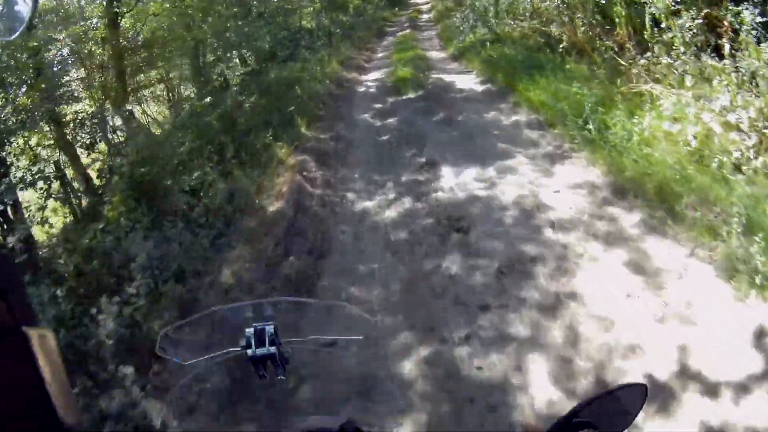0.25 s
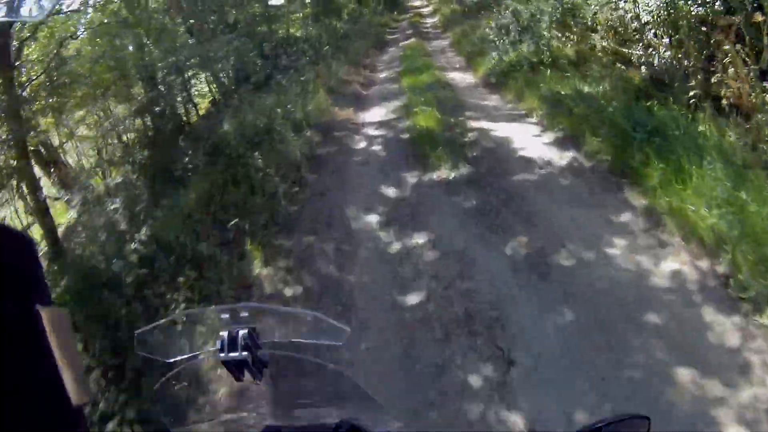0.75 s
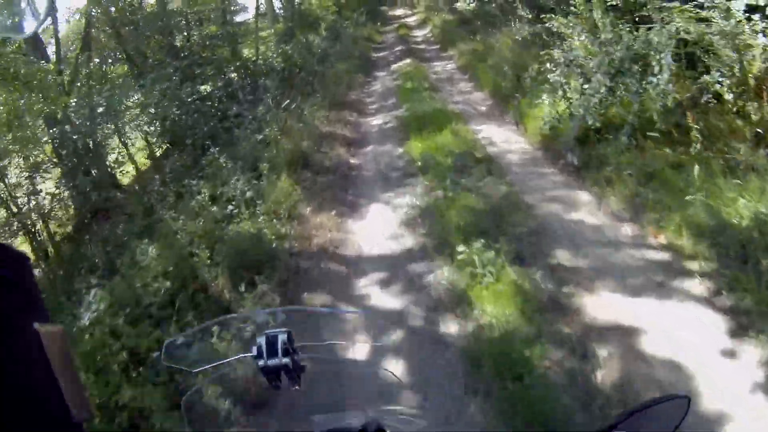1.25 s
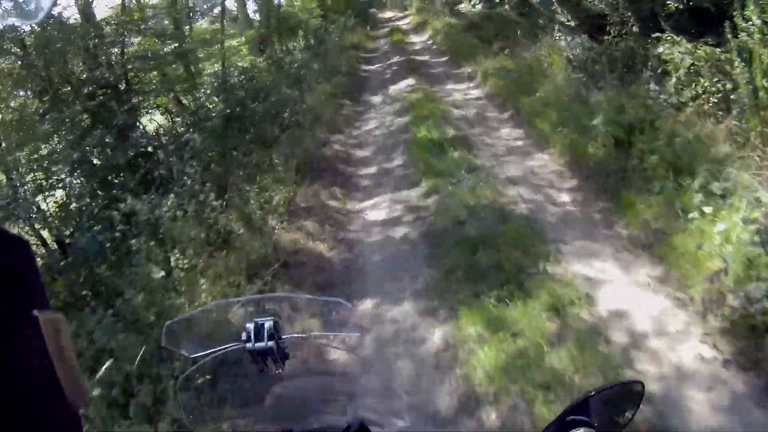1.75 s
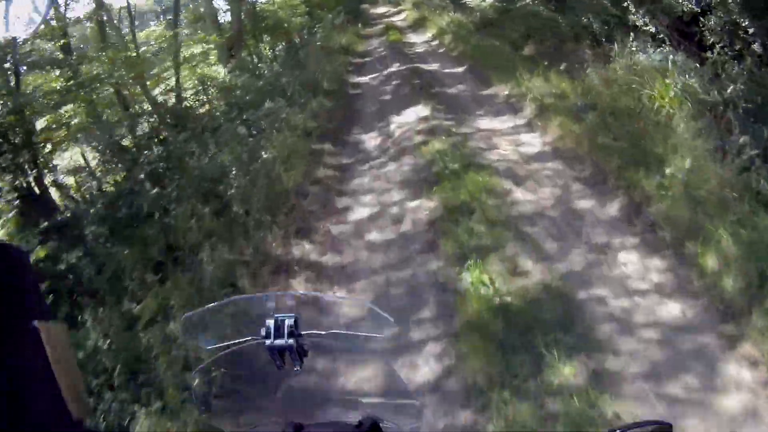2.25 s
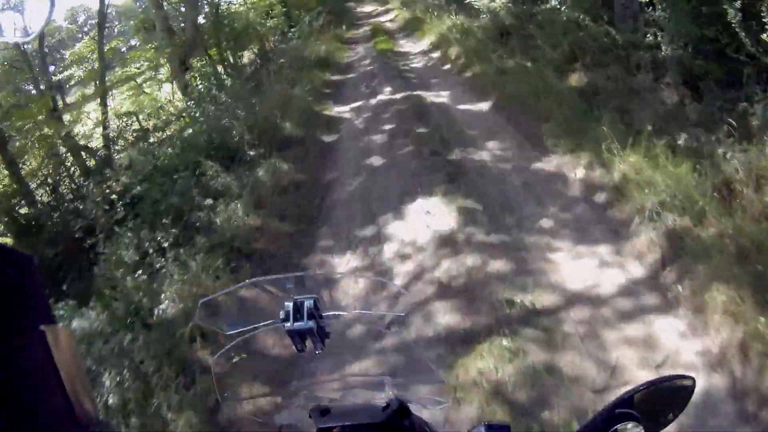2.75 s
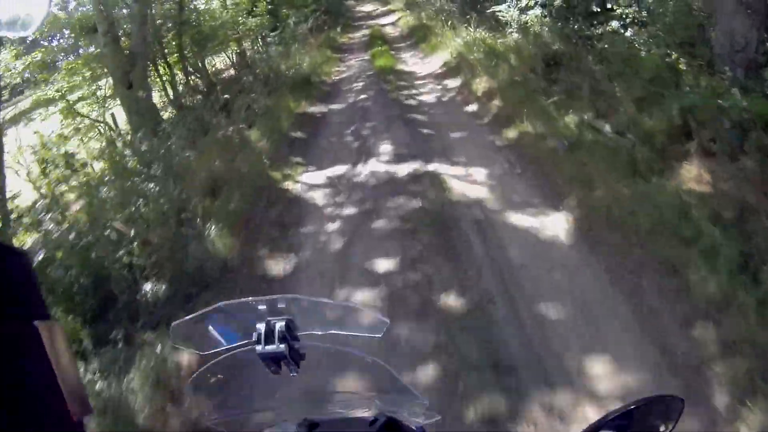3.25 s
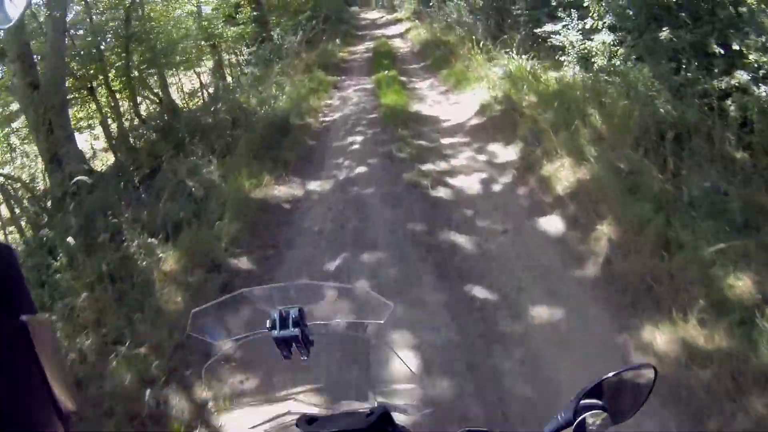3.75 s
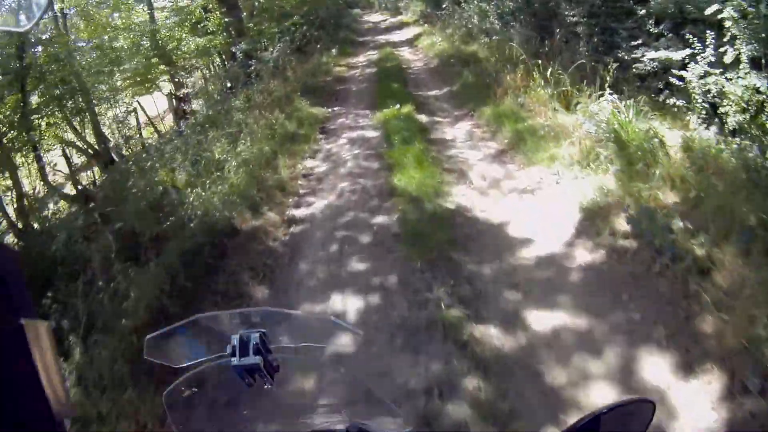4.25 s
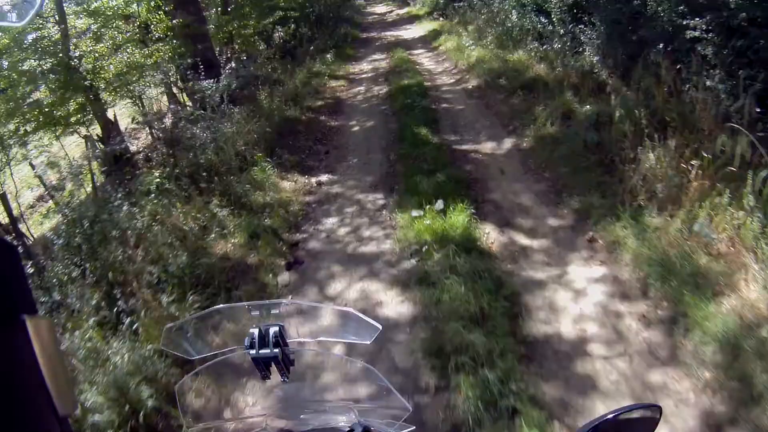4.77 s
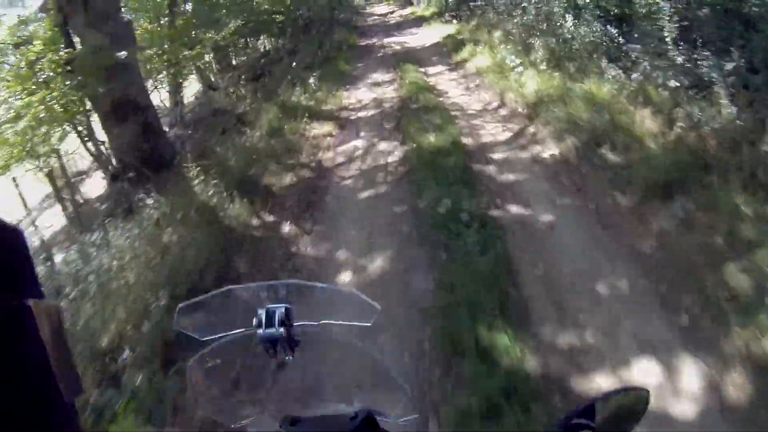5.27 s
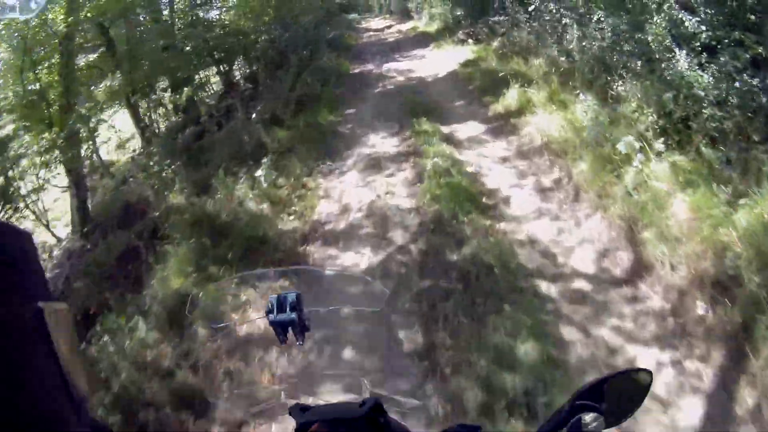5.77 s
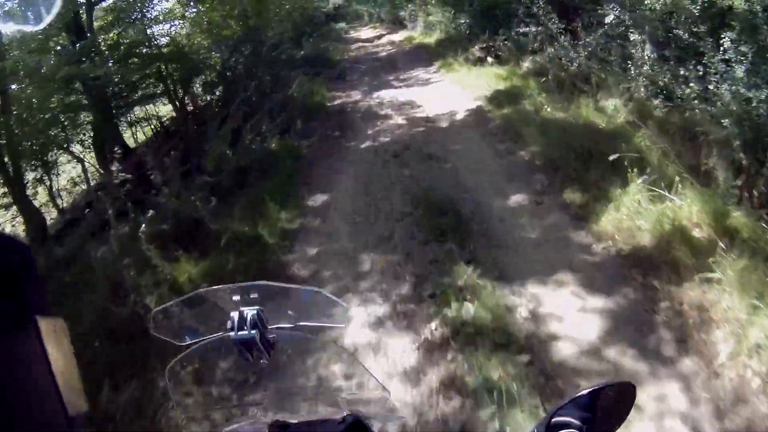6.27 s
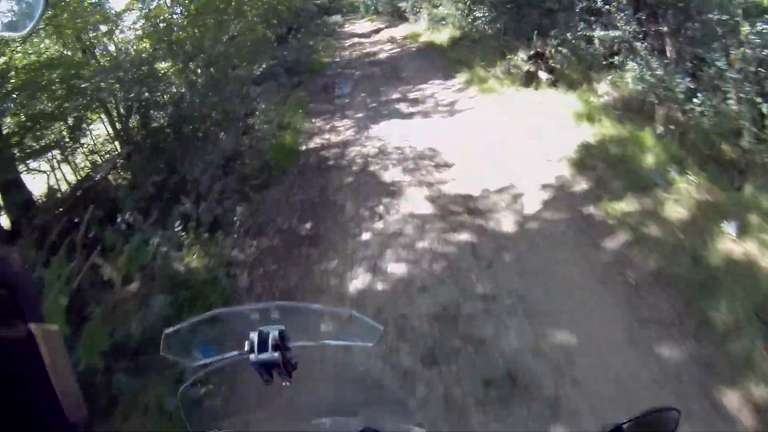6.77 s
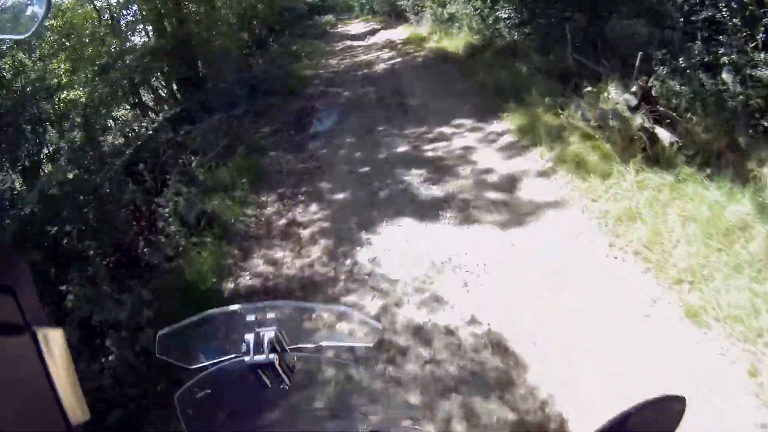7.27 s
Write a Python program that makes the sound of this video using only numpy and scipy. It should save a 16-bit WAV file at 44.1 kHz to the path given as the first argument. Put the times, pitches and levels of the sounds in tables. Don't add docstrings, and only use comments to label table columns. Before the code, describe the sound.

A camera loose in its sealed plastic case knocks irregularly against the walls as a motorcycle crosses a bumpy dirt track. Short, hollow, boxy clacks cluster in the first second and a half, thin out in the middle, then return and end in a dense rattle. Beneath are low rocking rumble, buzzing plastic, faint engine hum and thin hiss. The microphone is inside the case, very close and dry.

```python
import sys
import numpy as np
from scipy import signal
from scipy.fft import rfft, irfft, next_fast_len
from scipy.io import wavfile
from scipy.ndimage import uniform_filter1d, map_coordinates

SR = 44100
rng = np.random.default_rng(int(sys.argv[2]) if len(sys.argv) > 2 else 0)


def ratio_of_db(decibels):
    return 10 ** (np.asarray(decibels, float) / 20)


def unload_audio(sound):
    columns = np.transpose(np.atleast_2d(sound))
    steps = np.round(np.clip(columns, -1, 1) * 32767)
    wavfile.write(sys.argv[1], SR, steps.astype(np.int16))


N = 331632


def unit(x):
    return x / np.sqrt(np.mean(x ** 2) + 1e-20)


def curves(rows):
    time_s, *columns = np.transpose(rows)
    return [np.interp(np.arange(N) / SR, time_s, column) for column in columns]


def wobble(rate):
    knots = rng.standard_normal(int(N * rate / SR) + 4)
    return map_coordinates(knots, [np.arange(N) * rate / SR])


def filtered(x, response):
    size = next_fast_len(N + 8192)
    spectrum = rfft(x, size) * response(np.fft.rfftfreq(size, 1 / SR))
    return irfft(spectrum, size)[:N]


def colour(points):
    point_hz, point_db = np.transpose(points)
    return lambda hz: ratio_of_db(np.interp(np.log(hz + 1), np.log(point_hz + 1), point_db))


def resonances(peaks):
    def response(f):
        total = 0
        for k, (centre, width, db) in enumerate(peaks):
            damping = 1j * f * width
            total = total + (-1) ** k * ratio_of_db(db) * damping / (centre * centre - f * f + damping)
        return total
    return response


def patchy(patchy_db):
    z = signal.stft(rng.standard_normal(N + 512), nperseg=512)[2]
    field = uniform_filter1d(rng.standard_normal(z.shape), 6, 0)
    field = uniform_filter1d(field, 10, 1)
    return signal.istft(z * ratio_of_db(patchy_db * unit(field)), nperseg=512)[1][:N]


def ring(modes, t, attack, scatter_db, alternate):
    tones = 0
    for k, (hz, db, t60) in enumerate(modes):
        sign = (-1) ** (k * alternate)
        tones = tones + sign * ratio_of_db(db + scatter_db[k] - 60 * t / t60) * np.sin(2 * np.pi * hz * t)
    return tones * (1 - np.exp(-t / attack)) ** 2


def blows():
    # start_s, peak_db
    on_frame = [(.102, -28.5), (.178, -32.5), (.33, -25.5), (.486, -20), (.546, -28.5), (.709, -21),
                (.817, -34), (1.003, -21.5), (1.163, -21.5), (1.376, -29), (1.752, -30), (2.113, -28),
                (2.389, -27), (2.542, -30), (2.588, -34.5), (3.88, -23.5), (4.033, -30), (4.331, -28),
                (5.106, -27.5), (5.356, -24.5), (5.545, -26), (5.632, -27), (5.916, -31), (6.07, -32.5),
                (6.373, -26), (6.443, -30), (6.815, -24.5), (6.923, -21), (7.262, -34), (7.392, -34.5)]
    # start_s, peak_db
    on_door = [(.645, -30.5), (.755, -30.5), (0.774, -30.5), (0.787, -29.5), (.8, -32), (.963, -27),
               (1.158, -29.5), (1.26, -45.5), (1.432, -27), (1.794, -32.5), (4.997, -46), (5.8, -20),
               (5.836, -27), (6.082, -38.5), (6.673, -41.5), (7.017, -32), (7.031, -24), (7.054, -38),
               (7.083, -28.5), (7.097, -23), (7.152, -32), (7.185, -35), (7.218, -33.5), (7.242, -27),
               (7.27, -30), (7.306, -32), (7.337, -42), (7.348, -31.5), (7.383, -33), (7.449, -29.5)]
    # start_s, peak_db
    on_shell = [(0.0, -40), (0.532, -38), (.899, -41), (1.206, -37.5), (3.481, -46), (3.741, -38.5),
                (4.221, -41), (5.675, -42.5), (5.712, -40), (6.149, -46), (6.705, -34), (7.061, -34),
                (7.18, -37), (7.227, -44)]
    # start_s, peak_db
    grazes = [(.26, -43.5), (0.394, -45), (0.434, -39.5), (1.065, -42), (3.08, -55), (3.572, -45.5),
              (3.669, -42), (6.649, -42), (6.754, -43), (6.951, -36.5), (7.065, -38), (7.135, -40),
              (7.398, -31.5), (7.426, -37), (7.511, -36.5)]
    # start_s, peak_db
    rebounds = [
        (0.853, -40),
        (1.876, -38.5),
        (5.404, -38.5),
        (5.598, -52),
        (5.762, -43),
        (6.974, -37),
        (7.44, -45),
        (7.468, -37.5),
    ]
    # shell_db, walls_db, door_db, frame_db,
    # thinning (dB the shell loses per dB of a hard blow)
    place_parts = [
        (-12.5, -8, -12.5, -10.5, 0.56),
        (-14, -8, -7, -17.5, .12),
        (-8.5, -4.5, -16, -18, .1),
        (-20.5, -3, -3, -13, .1),
        (-10, -3, -12.5, -13.5, .1),
    ]
    places = [on_frame, on_door, on_shell, grazes, rebounds]
    return sorted((s, db, *parts) for rows, parts in zip(places, place_parts) for s, db in rows)


def knocks():
    # pitch_hz, level_db, t60_s
    shell_modes = [(138.7, -13, 0.23), (219.6, -12, 0.081), (392, -0.5, 0.14), (455, 0.5, 0.035)]
    # pitch_hz, level_db, t60_s
    wall_modes = [(583, -3.5, 0.023), (646, -5.5, 0.024), (792, -4.5, 0.023), (897, -6, 0.03)]
    # pitch_hz, level_db, t60_s
    door_modes = [(1427, 2.5, 0.017), (1519, -0.5, 0.029)]
    # pitch_hz, level_db, t60_s
    frame_modes = [(1245, -3.5, 0.028), (1867, -3, 0.027), (2028, 5, 0.017), (2730, -15, 0.012),
                   (3350, -22, 0.027), (3670, -26, 0.021), (4830, -33, 0.02), (5500, -14.5, 0.0067),
                   (6470, -25, 0.015)]
    hard_db = -32.5
    detune = 0.008
    out, t, rows = np.zeros(N + SR), np.arange(SR // 6) / SR, blows()
    scatter = 1.5 * rng.standard_normal((len(rows), 22))
    pressed = 1 + 1.05 * np.exp(-t / 0.0051)
    free_s = np.diff([row[0] for row in rows], append=N / SR)
    for (s, db, shell_db, walls_db, door_db, frame_db, thinning), c, gap in zip(rows, scatter, free_s):
        lean_db = 35 * np.clip(door_db - frame_db, 0, 16) * t
        grip_db = 450 * np.clip(t - gap, 0, None)
        thin_db = thinning * max(db - hard_db, 0)
        shell_level = ratio_of_db(shell_db + 5.0 - thin_db - lean_db - grip_db) * pressed
        shell = shell_level * ring(shell_modes, t * (1 + detune * c[20]), 0.00053, c[1:], alternate=True)
        walls = ratio_of_db(walls_db) * ring(wall_modes, t, 0.0017, c[5:], alternate=True)
        door_ring = ring(door_modes, t * (1 + detune * c[21]), 0.0011, c[9:], alternate=False)
        door = ratio_of_db(door_db + 7.5) * door_ring
        frame = ratio_of_db(frame_db + 9) * ring(frame_modes, t, 0.0012, c[11:], alternate=False)
        side = np.sign(c[0])
        start = round((s + 0.0011) * SR)
        out[start:][:len(t)] += side * ratio_of_db(db) * (shell + walls + door + frame)
    return out[:N]


def engine():
    # time_s, hum_hz, level_db
    hum_line = [(0, 88.4, -67), (1, 93, -47.5), (1.55, 89.6, -55.5), (1.8, 88, -96), (2.95, 86, -78),
                (3.15, 88, -59), (3.9, 100.2, -54), (4.5, 104, -68), (4.8, 99.6, -59), (7.52, 94.3, -72)]
    hum_hz, hum_db = curves(hum_line)
    turn = 2 * np.pi * np.cumsum(hum_hz + 0.64 * wobble(5.92)) / SR
    hum = ratio_of_db(hum_db - 8.0) * np.sin(turn)
    firing = 1 + 0.048 * np.sin(turn / 2)
    return hum, firing


def shaking():
    # time_s, strength_db
    pace = [(0, 0.5), (.6, 3.5), (1.3, -1), (2.2, 0), (3.4, -0.5), (3.9, 4), (4.8, 2), (5.4, 7), (6.1, 6.5),
            (6.6, 4.5), (7.3, 7), (7.52, 3)]
    # time_s, vibration_swell_db, rocking_swell_db
    ruts = [(0.0, 4.5, 13), (0.299, 1, 9.5), (.46, 5, 10), (.85, 4, 19.5), (1.05, 6.5, 14.5), (1.19, 7, 12),
            (1.49, 7, 13), (1.82, 2.5, 14.5), (1.98, 1.7, 6.5), (2.16, 1.5, 7), (2.41, -1, 7),
            (2.6, 2.5, 8), (2.78, -1, 5), (3.02, -2, 6.5), (3.16, 6, 9.5), (3.581, 3.5, 7), (3.77, 2.5, 8),
            (3.94, 0.5, 8.5), (4.28, 1.2, 0.5), (4.45, 5.5, 3.5), (4.9, 1, 3), (5.26, -0.2, -3),
            (5.4, -2.3, 0), (5.55, -0.5, -2), (5.84, -1.8, 7), (6.07, 3, 5.5), (6.85, 1.5, 12),
            (7.05, 3, 14), (7.2, -1.7, 19), (7.42, 4, 8.5)]
    rut_s, rock_s = 0.11, 0.079
    t = np.arange(N) / SR
    pace_db, = curves(pace)
    rut_db = sum(db * np.exp(-((t - s) / rut_s) ** 2) for s, db, _ in ruts)
    throw_db = sum(db * np.exp(-((t - s) / rock_s) ** 2) for s, _, db in ruts)

    def follow(quiet_db, pace_share, rut_share, swell_db):
        return quiet_db + pace_share * pace_db + rut_share * swell_db

    rock_db = follow(-59, 0.87, 0.81, throw_db)
    drone_db = follow(-60.5, 1.1, 0.77, rut_db)
    buzz_db = follow(-59.5, 1.095, 0.67, rut_db)
    hiss_db = follow(-68, 0.91, 0.72, rut_db)
    return rock_db, drone_db, buzz_db, hiss_db


def ride(firing):
    # centre_hz, width_hz, level_db
    mount = [(25.5, 16.3, 2), (61.3, 11.7, 0.5), (88, 57, -21.5)]
    # pitch_hz, level_db
    sway = [(3, -33), (10, -20), (45, 0.5), (75, -18), (140, -56)]
    # pitch_hz, density_db (dB per Hz)
    drone_colour = [(53, -4), (90, -3.5), (162, -5.5), (394, -5.5), (575, -9), (658, -10.5), (754, -10),
                    (902, -10.5), (1100, -15.5), (1430, -61), (2420, -120)]
    # centre_hz, width_hz, level_db
    buzz_modes = [(1153, 106, -8), (1479, 115, 1), (1873, 130, -3), (2937, 44, -7.5), (3490, 41, -28),
                  (3580, 660, -20), (4120, 680, -19)]
    # pitch_hz, density_db (dB per Hz)
    hiss_colour = [(1300, -66), (2200, -10), (2900, -4), (4000, -12), (4780, -15.5), (5270, -9),
                   (6760, -10), (7400, -15.5), (9600, -12.5), (11200, -12), (14600, -13.5), (15300, -10),
                   (15800, -11.5)]

    def rocking(f):
        swings = sum(resonances([mode])(f) ** 2 for mode in mount)
        return swings + 1j * colour(sway)(f)

    def buzzing(f):
        return resonances(buzz_modes)(f) / (1 + (900 / (f + 1)) ** 4)

    rock_db, drone_db, buzz_db, hiss_db = shaking()
    bump = wobble(13)
    rock = ratio_of_db(rock_db + 0.23) * unit(filtered(rng.standard_normal(N), rocking))
    drone_level = ratio_of_db(drone_db - 2.5 + 0.074 * bump)
    drone = drone_level * unit(filtered(patchy(patchy_db=1.15), colour(drone_colour)))
    chatter = patchy(patchy_db=-0.5) * ratio_of_db(1.6 * wobble(400)) * firing
    buzz_level = ratio_of_db(buzz_db + 0.14 + 0.46 * bump + 0.23 * wobble(35))
    buzz = buzz_level * unit(filtered(chatter, buzzing))
    hiss_level = ratio_of_db(hiss_db + 2.5 + 0.18 * bump + 0.85 * wobble(45))
    hiss = hiss_level * unit(filtered(patchy(patchy_db=1.5), colour(hiss_colour)))
    return rock + drone + buzz + hiss


def whine():
    # pitch_hz, level_db (rms)
    whine_tones = [(6858, -80), (13544, -91), (13717, -77)]
    t = np.arange(N) / SR
    return sum(ratio_of_db(db + 3.2 + 1.2 * wobble(8)) * np.sin(2 * np.pi * hz * t) for hz, db in whine_tones)


def ticks():
    # start_s, peak_db, latch_db (relative to the peak)
    tick_rows = [(0.2508, -39, -22), (0.4243, -36, -23), (0.4865, -38.5, -9), (0.7103, -41, -4),
                 (1.0035, -39, -7), (1.1662, -45, -5), (1.876, -19, -40), (2.3898, -51.5, 2),
                 (3.5514, -47, -13), (3.8806, -61, -4), (5.357, -51, -7), (5.632, -55, 3), (5.802, -47, -8),
                 (6.136, -52, 4), (6.263, -50, -3), (6.3745, -46, 4), (6.657, -33, -13), (6.8184, -49, -8),
                 (6.9262, -43, -10), (6.9514, -34, -16), (7.0574, -49, -5), (7.098, -34, -12),
                 (7.1414, -36, -11.5), (7.2719, -40, -10), (7.31, -40, -12), (7.3526, -32.5, -10),
                 (7.3866, -37.5, -9), (7.429, -39, -8), (7.4704, -37, -15), (7.5114, -41, -9)]
    # centre_hz, width_hz, level_db
    grit = [(5470, 3500, -14), (9700, 440, -4.5), (10900, 690, -2), (13200, 2200, -7), (14900, 730, -3)]
    # centre_hz, width_hz, level_db
    latch_modes = [(2930, 390, 4.5), (3340, 200, 2), (3700, 530, -4.5)]
    t60_s = 0.023
    snap = 0.42
    bright, latch, t = np.zeros(N + SR), np.zeros(N + SR), np.arange(SR // 25) / SR
    noises = rng.standard_normal((len(tick_rows), len(t)))
    for (s, db, latch_db), noise in zip(tick_rows, noises):
        decay_db = 60 * t / t60_s * ratio_of_db(snap * max(db + 37.5, 0))
        burst = ratio_of_db(db - decay_db) * (1 - np.exp(-t / 0.00045)) * noise
        start = round((s + 0.0005) * SR)
        bright[start:][:len(t)] += ratio_of_db(-2) * burst
        latch[start:][:len(t)] += ratio_of_db(latch_db + 12) * burst
    return filtered(bright, resonances(grit)) + filtered(latch, resonances(latch_modes))


def jolts():
    # start_s, peak_db, pitch_hz
    throws = [
        (0.708, -37.5, 42),
        (0.791, -44, 42),
        (3.878, -52, 42),
        (5.359, -48, 42),
        (5.8, -38, 42.4),
        (6.819, -41, 43.3),
        (7.093, -37, 42.5),
        (7.149, -40, 41.7),
    ]
    out, t = np.zeros(N + SR), np.arange(SR // 3) / SR
    for s, db, hz in throws:
        swing = ratio_of_db(db - 60 * t / 0.38) * np.sin(2 * np.pi * hz * t)
        out[round(s * SR):][:len(t)] += swing * (1 - np.exp(-t / 0.0021))
    return out[:N]


def scene():
    hum, firing = engine()
    return (knocks() + ticks() + jolts() + hum + ride(firing) + whine())[None]


def roll_off(x):
    return signal.sosfilt(signal.butter(12, 16930, fs=SR, output="sos"), x)


def record(dry):
    top_hz = 15820
    mix = filtered(dry[0], lambda hz: hz < top_hz)[None]
    return roll_off(mix)


dry = scene()
out = record(dry)
unload_audio(out)
```